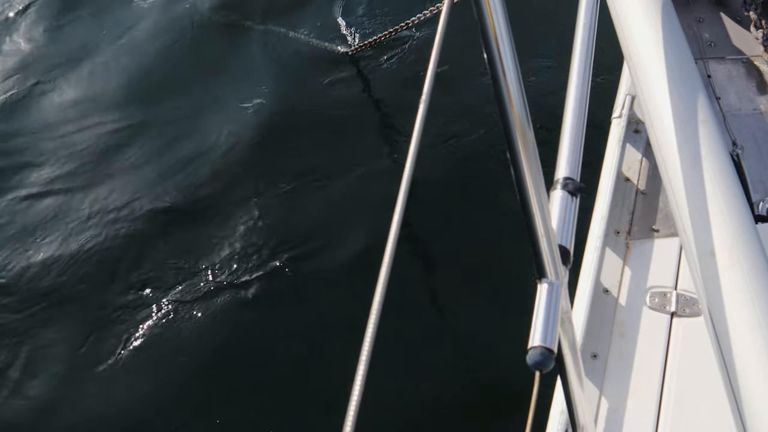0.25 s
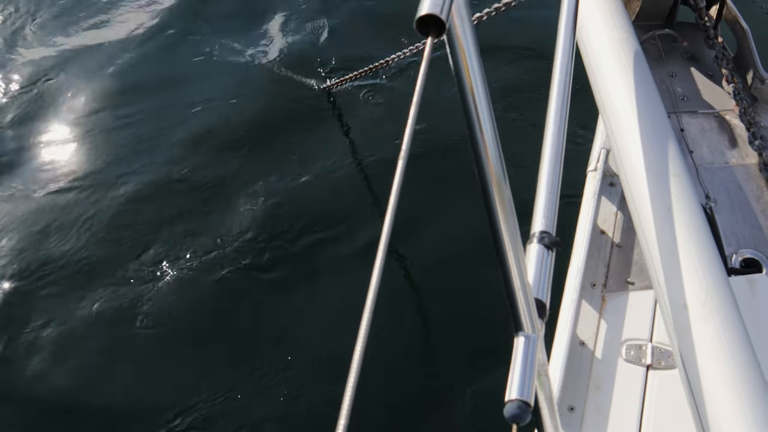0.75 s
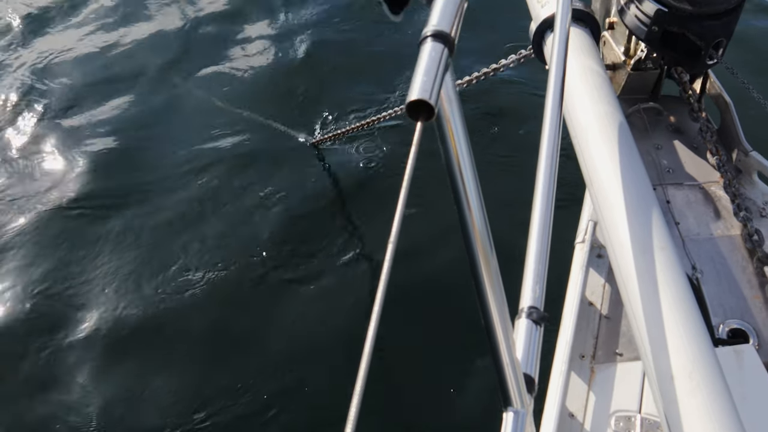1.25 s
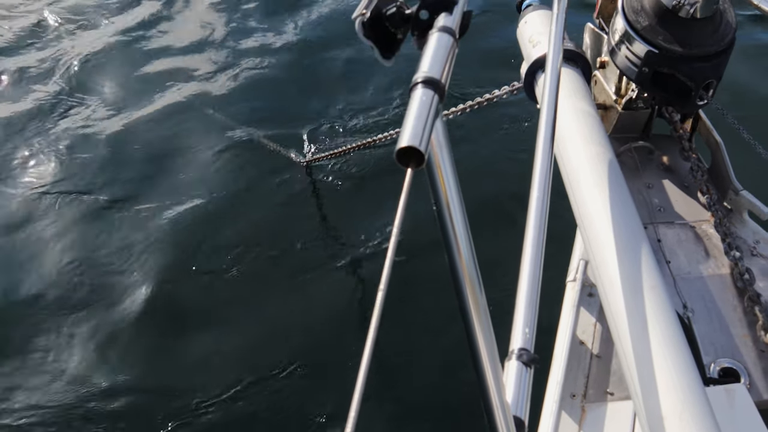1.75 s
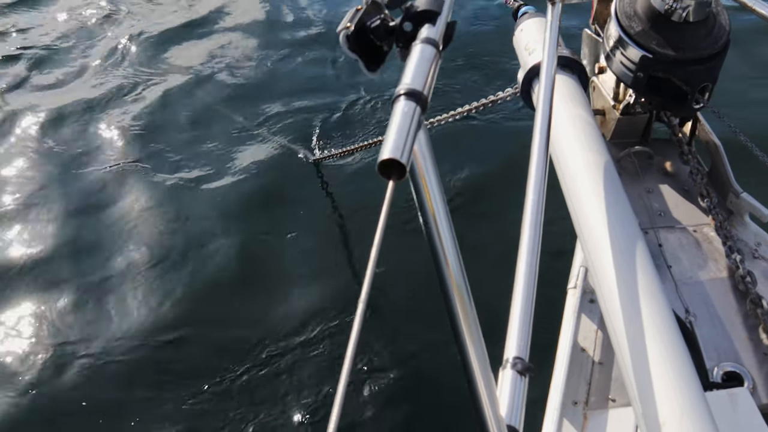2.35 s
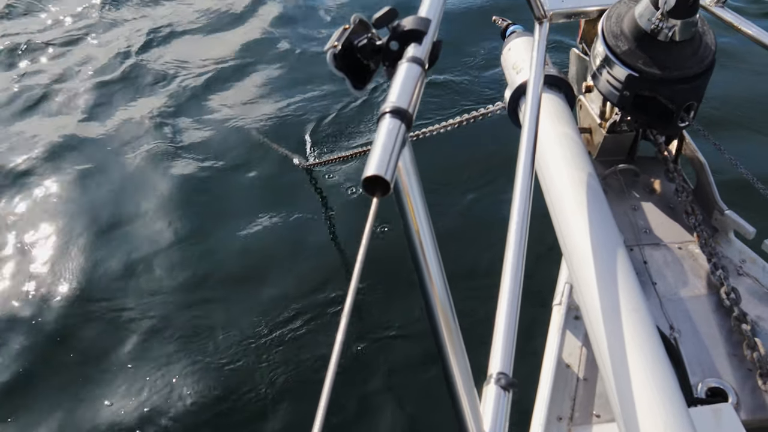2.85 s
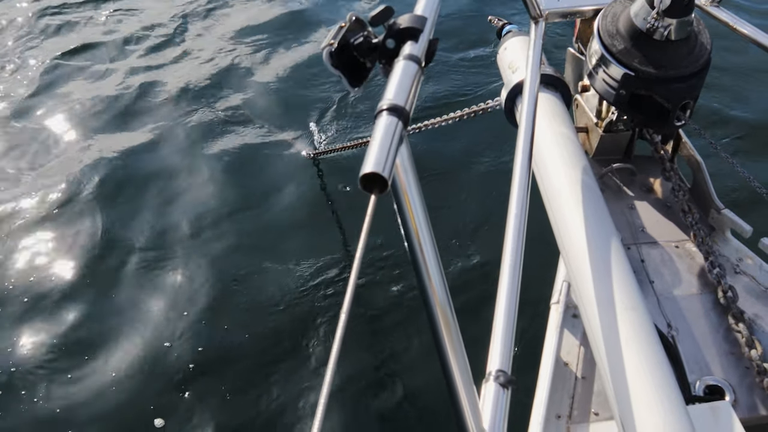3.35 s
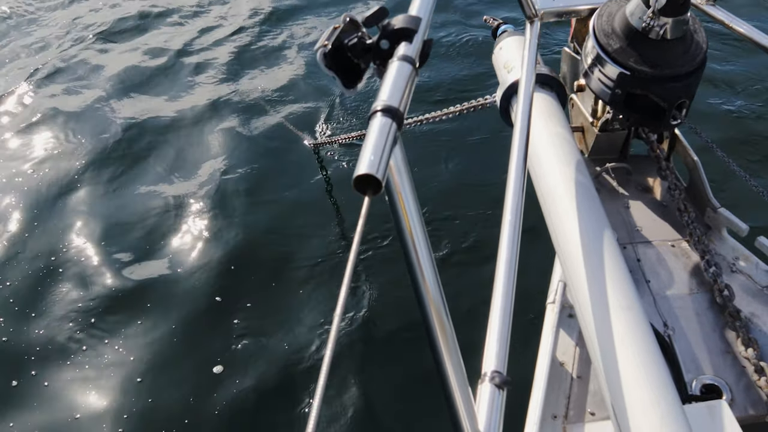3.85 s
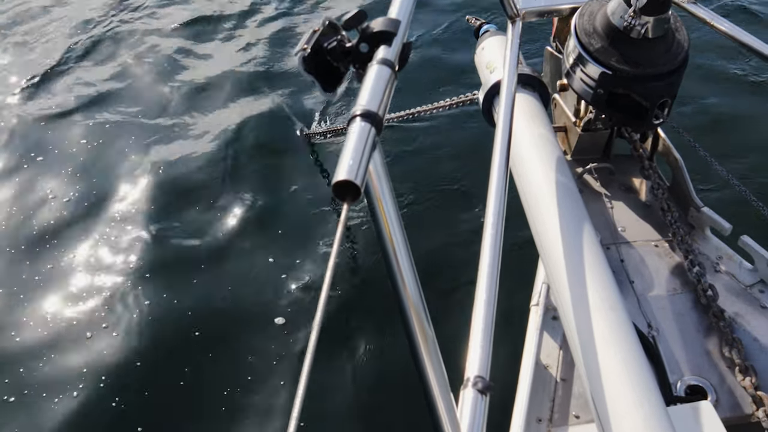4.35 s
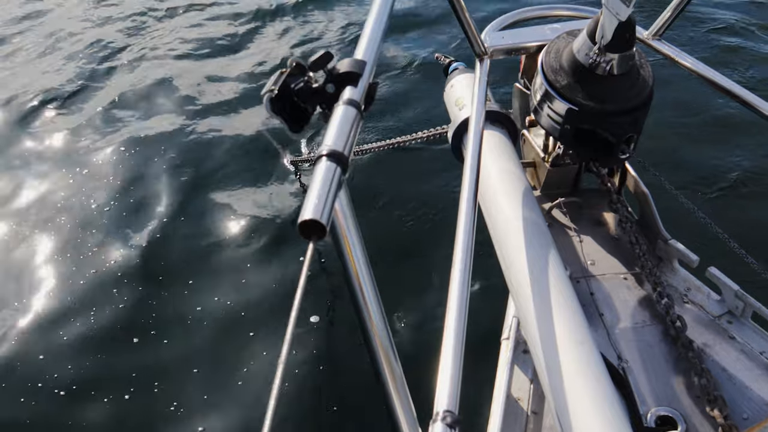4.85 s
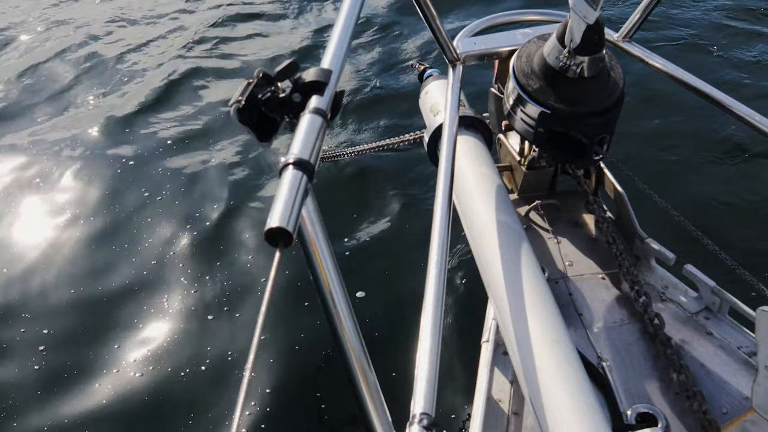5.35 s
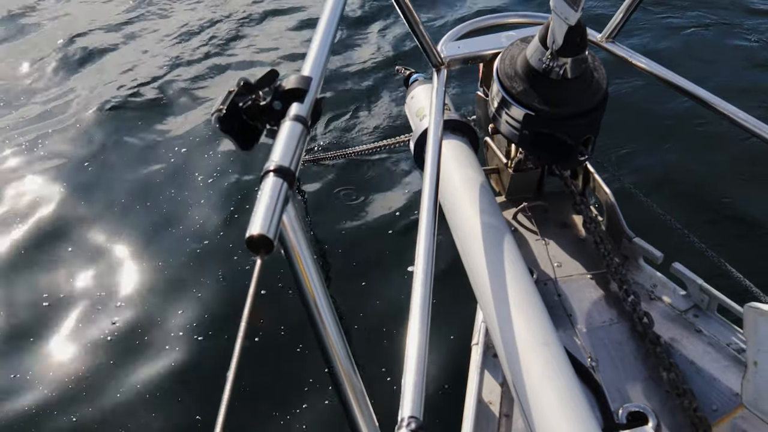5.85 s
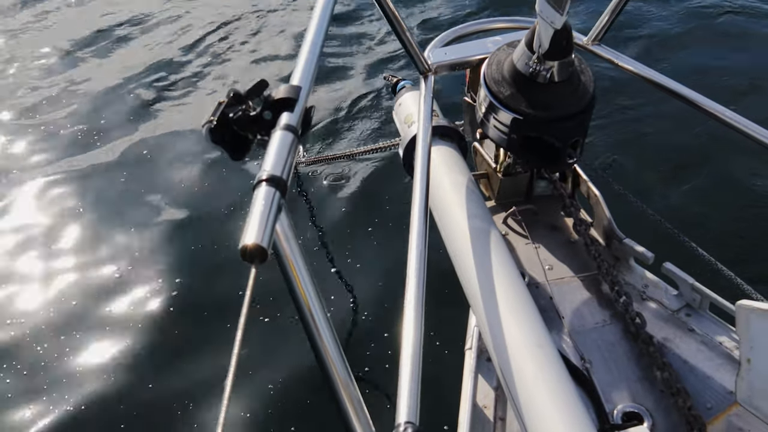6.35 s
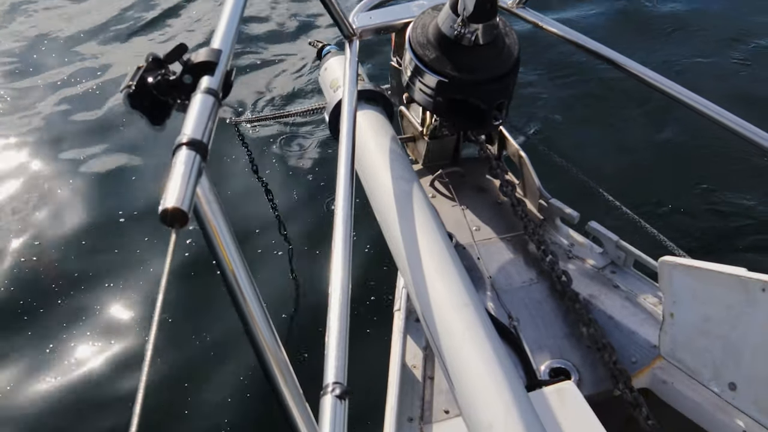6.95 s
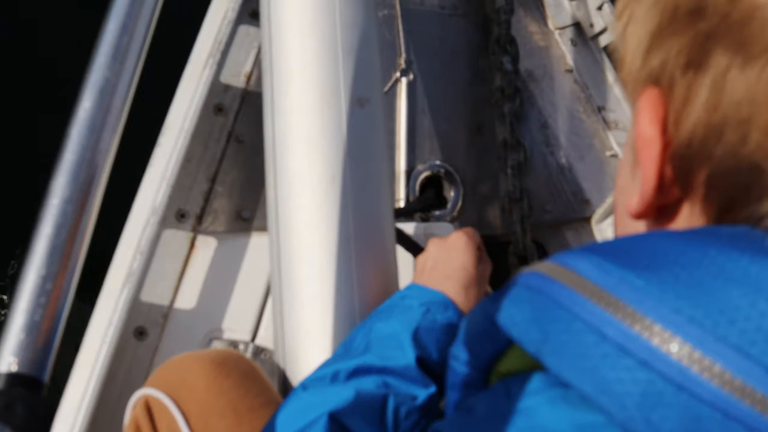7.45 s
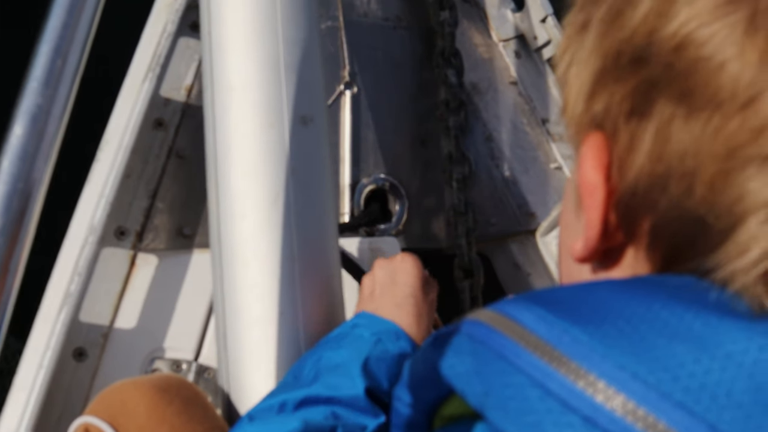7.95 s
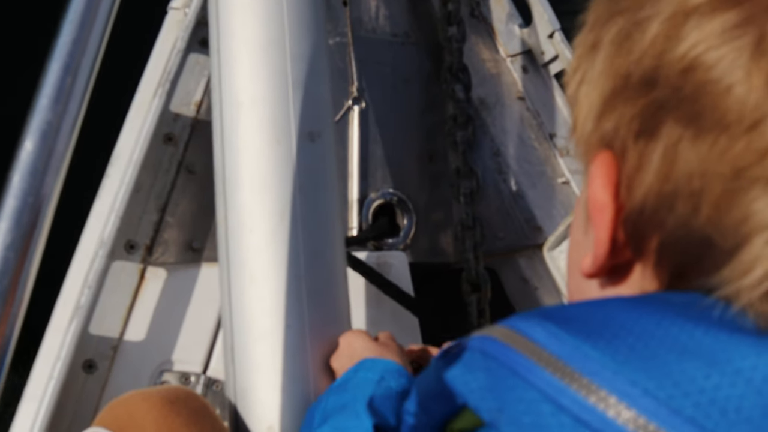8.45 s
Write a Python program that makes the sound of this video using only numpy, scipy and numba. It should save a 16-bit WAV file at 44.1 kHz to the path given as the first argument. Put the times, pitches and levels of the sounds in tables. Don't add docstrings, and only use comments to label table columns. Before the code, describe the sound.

Sparse, loud chain knocks boom and crack on a metal boat deck, with ringing rail, small link ticks, drips and low idling hum between.

```python
import sys
import numpy as np
from scipy import signal
from scipy.fft import rfft, irfft
from scipy.io import wavfile
from numba import njit

SR = 44100
rng = np.random.default_rng(int(sys.argv[2]) if len(sys.argv) > 2 else 0)


def persist_wave(psi):
    counts = np.round(np.clip(psi, -1, 1) * 32767).astype(np.int16)
    wavfile.write(sys.argv[1], SR, np.atleast_2d(counts).T)


def voltage_ratio(level):
    return 10 ** (np.asarray(level, float) / 20)


N = 383669

# start_s, boom_230hz_db, hull_120hz_db, deck_420hz_db, steel_1100hz_db
KNOCKS = [(0.018, -16.5, -33, -31.5, -51), (0.467, -31, -70, -37.5, -45.5), (0.640, -14.5, -17, -15, -22.5),
          (0.656, -9.5, -12.5, -16, -16), (1.090, -2, -5, -9.5, -7.5), (1.104, -8.5, -8, -3.5, -40.5),
          (3.442, -40.5, -46, -49.5, -65), (3.522, -47, -42.5, -43, -63), (3.635, -14, -6.5, -9, -14.5),
          (3.645, -8, -10.5, 0, -5), (3.829, -32, -31, -21, -42.5), (3.852, -30, -38, -24, -53),
          (5.716, -7, -11.5, -10.5, -15), (5.743, -18.5, -9, -9.5, -22.5), (5.823, -11, -32.5, -12, -4.5),
          (6.506, -47, -48, -34.5, -51.5), (6.82, -9.5, -16.5, -22, -15.5), (6.843, -9, -12.5, -11, -21.5),
          (7.831, -16, -16.5, -14, -18.5)]
KNOCK_HZ = [60, 120, 230, 420, 1100, 3300, 15500]
# mode_hz, level_db
HULL_MODES = [(102, -12), (130, 1.5), (158, 3), (188, 4), (218, -2), (245, -0.5), (275, 4.5), (345, 5.5),
              (380, -3.5), (436, 3.5), (474, -5), (545, -0.5), (630, 4.5), (692, 0.5), (945, 3), (1180, -1),
              (1383, -3.5), (1525, 0.5), (1686, -2.5), (1865, -5), (2295, -14), (2930, -7)]
# mode_hz, t60_s
PLATE_T60 = [(100, 0.27), (250, 0.24), (500, 0.19), (1000, 0.21), (1600, 0.15), (2700, 0.15), (4000, 0.12),
             (5400, 0.11)]
# mode_hz, level_db
PLATE_COLOUR = [(80, -4.5), (700, -7), (1500, -5), (2000, -5.5), (4500, -12), (5300, -30), (7000, -45),
                (7500, -50.5)]
# start_s, peak_db, tilt_db_per_octave
BARE_STEEL = [(0.6403, -59, -13), (0.657, -53.5, -11), (1.0903, -37.5, -2.5), (3.635, -43.5, -3.5),
              (3.644, -30, -4), (5.718, -54.5, 0.5), (5.823, -30, 3), (6.822, -61, -3), (7.830, -46.5, -9)]
# centre_hz, spread_log_pitch, level_db, t60_s
CRACKS = [
    (3130, 0.24, 6.5, 0.11),
    (6300, 0.33, -1.7, .11),
    (8760, 0.32, 0, 0.082),
    (2620, 0.5, 1.5, 0.011),
]
# start_s, level_db, pitch_hz, t60_s
RAIL = [(1.092, -29, 1040, 0.45), (1.092, -29, 1037.2, 0.47), (1.092, -28, 1109, .17),
        (3.647, -20.5, 1054, 0.37), (3.646, -37, 1031, .85), (3.647, -26, 982, .28),
        (3.647, -27, 1104, .26), (3.647, -28, 1163, .23), (5.825, -21, 1053, 0.43), (5.823, -38, 1031, 0.8),
        (5.825, -28.5, 985, .2), (5.825, -32, 1125, .24), (5.825, -33, 1163, .28)]
# start_s, level_db, pitch_hz
CLANGS = [(.02, -28, 225), (.64, -14.5, 181), (.641, -29, 500), (.641, -29, 2050), (.641, -43, 3000),
          (.643, -20, 680), (0.659, -19, 128), (0.659, -29, 1230), (1.088, -9, 224), (1.09, -15.5, 850),
          (1.09, -17.5, 1225), (1.09, -19.5, 1480), (1.09, -19, 1853), (1.09, -12, 327),
          (1.089, -12.5, 1340), (1.089, -18, 1603), (1.091, -16.5, 982), (1.092, -30.5, 2600),
          (1.09, -12, 375), (1.1, -14, 446.7), (3.636, -14.5, 570), (3.638, -11.5, 690),
          (3.645, -16.5, 184), (3.645, -11.5, 890), (3.645, -18.5, 1125), (3.645, -19, 1554),
          (3.646, -21, 3094), (3.645, -8, 1669), (5.715, -14.5, 290.5), (5.718, -16, 330),
          (5.717, -14, 390), (5.73, -25, 570), (5.718, -20.5, 830), (5.717, -23.5, 1390),
          (5.743, -23.5, 901), (5.824, -18, 796), (5.824, -11, 920), (5.823, -18, 1222), (5.826, -25, 2327),
          (5.825, -23, 2449), (5.823, -16.5, 1500), (5.823, -22, 1300), (5.823, -26.5, 350),
          (6.821, -13, 197.7), (6.82, -13, 350), (6.82, -8, 275), (6.82, -17, 420), (6.82, -34, 2210),
          (6.843, -14, 203), (6.82, -9.5, 395), (6.82, -31, 2000), (7.832, -18.5, 228), (7.811, -40, 228),
          (7.812, -44, 1120), (7.812, -53, 1674), (7.835, -12.5, 440), (7.832, -22, 620),
          (7.832, -21.5, 842), (7.833, -24.5, 760), (7.833, -26, 1020), (.659, -37, 3450),
          (7.83, -34, 3300)]
# start_s, level_db, centre_hz, spread_log_pitch, t60_s
CLUSTERS = [(.658, -31, 3300, 0.095, .04), (1.135, -18.5, 360, .06, .22), (1.135, -21, 235, .06, .15),
            (1.091, -18, 1700, .15, .05), (3.647, -32, 2900, .035, .24), (3.66, -18, 420, .1, .2),
            (3.685, -22, 500, .12, .15), (3.712, -24, 330, .2, .16), (3.85, -21, 355, .08, .1),
            (3.84, -42, 830, .05, .15), (5.718, -47, 7900, .025, .13), (5.718, -48, 9100, .03, .11),
            (5.824, -42, 6800, .04, .14), (5.824, -42.5, 10000, .04, .16), (5.824, -48.5, 10300, .04, .15),
            (5.824, -52, 11900, .05, .17), (5.825, -34, 2900, .05, .22), (5.81, -60, 9000, .3, .04),
            (5.715, -13, 285, .05, .15), (6.823, -20.5, 470, .06, .16), (6.821, -30, 1500, .12, .05),
            (7.833, -23, 170, 0.068, 0.11), (7.834, -21.5, 470, 0.0605, .2), (7.832, -25, 930, 0.058, 0.11),
            (7.831, -28, 1150, .08, .06), (7.86, -30, 480, 0.123, 0.16), (7.82, -40, 1200, .06, .05),
            (5.823, -32, 5250, 0.069, .13), (1.091, -42, 5250, .06, .14), (5.717, -50, 5200, .06, .14),
            (3.7, -25, 115, .15, 0.39), (3.665, -18, 355, .06, 0.19), (3.636, -18, 910, .06, .06),
            (3.646, -48, 11300, .07, .14), (6.85, -27, 120, 0.14, .2), (1.1, -30, 65, 0.19, .3),
            (1.15, -34, 1050, .02, .22), (1.094, -16, 850, .05, .05), (1.158, -24, 330, .1, .17),
            (1.1, -22, 1900, .2, .04), (3.715, -30, 1075, .03, .2), (3.7, -24, 200, .1, .25),
            (3.636, -18, 200, .08, .15), (3.69, -36, 1700, .03, .2), (3.858, -28, 420, .15, .07),
            (5.722, -15, 290, .04, .12), (5.745, -22, 800, .1, .08), (5.86, -40, 2300, .2, .2),
            (5.99, -48, 1050, .008, .3), (.657, -26, 1900, .3, .03), (.672, -38, 3200, .25, .08),
            (6.846, -42, 3000, .25, .1), (7.831, -23, 1000, .08, .07), (7.86, -24, 450, .1, .12),
            (7.875, -42, 1050, .15, .17), (3.444, -46, 650, .2, .04), (6.507, -44, 650, .2, .04)]
# start_s, level_6800hz_db, ring_factor, relative_5600hz_db, relative_9100hz_db
TICKS = [(6.935, -64, 0.62, 9, 7), (6.9514, -55, 0.88, 11, 9.5), (6.96, -53.5, 0.57, 15.5, 2),
         (6.966, -51.5, 0.91, 8, 2), (7.555, -68, .8, -5, -3), (7.586, -62, .8, -10, -10),
         (7.596, -56, 0.81, -8, -3), (7.602, -52, 0.95, -17, -11), (7.613, -55, 1.0, -19, -11),
         (7.8019, -19.5, 0.66, -15.5, -11.5), (7.83, -33.5, 0.38, 6.5, -12), (8.043, -54, 0.66, -15, -15),
         (8.0504, -39.5, 1, -1, -1), (8.329, -57, 0.98, 0, -4), (8.3544, -57, 1.0, -8, -10),
         (8.3619, -59, 1.0, 0, -9)]
# mode_hz, level_db, t60_s
LINK_MODES = [(5360, -6, 0.02), (5710, -2, 0.024), (6530, -7, 0.025), (6740, -10.5, 0.073),
              (6800, -0.5, 0.038), (6990, -22, 0.06), (8495, -15, 0.021), (9060, 7.5, 0.023),
              (9140, -5, 0.05), (10400, -23, 0.023), (11400, -21, 0.018), (14020, -25.5, 0.022),
              (14930, -18, .018)]
# start_s, peak_db, pitch_hz
SNAPS = [(0.056, -49, 3280), (.33, -55, 3470), (1.889, -45, 4740), (1.912, -48.5, 7100),
         (2.153, -40.5, 4300), (2.424, -48, 1750), (2.425, -55, 3800), (3.066, -51, 3200),
         (3.196, -52, 3900), (3.232, -53, 4500), (3.374, -50.5, 2500), (6.79, -57.5, 2960),
         (6.796, -49, 2990), (6.809, -42, 2440), (7.523, -62, 3000), (7.553, -57, 3496), (7.79, -50, 1900),
         (7.942, -49, 1900), (7.965, -53, 2107)]
# pitch_ratio, level_db
SNAP_MODES = [(1, -1.5), (1.09, -4), (1.4, -5.5), (1.75, -10.5), (2.2, -16), (2.8, -16)]
# start_s, peak_db, pitch_hz, t60_s
DRIPS = [(3.102, -48, 3050, 0.018), (3.136, -54, 4000, .015), (3.172, -26, 3960, 0.02),
         (3.177, -48, 2360, .02), (3.187, -43, 1950, 0.014), (3.268, -45.5, 2080, .02),
         (5.0, -58, 1750, .03), (5.293, -55, 1903, .08), (5.549, -47.5, 1440, 0.15),
         (5.572, -46.5, 1210, 0.15), (6.1, -53, 2640, 0.026), (6.115, -44, 1140, 0.072),
         (6.132, -57, 2740, 0.024), (6.24, -56, 2700, .03), (6.411, -41, 1330, 0.051),
         (6.451, -47, 1310, .05), (6.558, -40, 1180, 0.034), (6.71, -42, 1515, 0.036),
         (6.965, -43, 11400, 0.015), (6.99, -46, 1380, .043), (7.025, -46, 2560, 0.025),
         (7.035, -46, 1740, .04), (7.061, -38.5, 1987, 0.015), (8.243, -50, 1992, 0.032)]
CREAK_HZ = [3960, 2300]
# middle_s, peak_db, pitch_hz, half_length_s
THUMPS = [(0.319, -29.5, 57, 0.01), (0.799, -34, 43.4, 0.052), (0.954, -31.5, 54.7, 0.0098),
          (1.46, -41, 59.6, 0.027), (1.716, -30, 46.2, 0.029), (1.891, -32.5, 54.3, 0.021),
          (1.96, -39, 55.7, 0.025), (2.053, -48, 45.3, 0.026), (2.389, -27.5, 59, 0.01),
          (2.515, -37, 47.5, 0.022), (2.747, -34, 55.7, 0.023), (2.952, -33.5, 47.7, 0.014),
          (3.057, -36.5, 50.3, 0.034), (5.408, -35.5, 37.5, 0.022), (7.003, -47, 42.6, 0.029),
          (7.152, -34, 81, 0.03), (7.406, -21, 66.7, 0.0093), (7.589, -41, 46, 0.025),
          (7.666, -26.5, 71.6, 0.011), (7.705, -38, 71, 0.013), (7.918, -29, 63.6, 0.014)]
# time_s, level_db
WIND_LEVEL = [(0.0, -48), (0.29, -46), (0.85, -47.5), (1.38, -49.5), (1.94, -45.5), (4.07, -47),
              (4.38, -45), (5.21, -51), (5.67, -46), (6.32, -50), (7.0, -44), (7.17, -54), (7.58, -50.5),
              (7.95, -62), (8.7, -52.5)]
# frequency_hz, level_db_per_hz
WIND_SPECTRUM = [(15, -7), (30, -12.5), (55, -6.5), (100, -14.5), (150, -27.5), (250, -29.5)]
# middle_s, peak_db,
# half_length_s
STIRS = [(1.056, -63, 0.061), (1.683, -78, 0.1), (3.162, -57.5, 0.1), (5.018, -71.5, 0.42),
         (5.814, -53, .012), (6.654, -59.5, .35), (7.299, -68, 0.48), (8.297, -59.5, 0.094),
         (8.59, -66, 0.29)]
# frequency_hz, level_db_per_hz
RUSTLE_SPECTRUM = [(900, -21), (1600, -1.5), (2500, -6.5), (4500, -9), (6000, -18.5), (10000, -20.5)]
# centre_hz, width_hz, level_db, lag_s, fade_s
FIRING = [
    (1255, 110, -69, 0, .015),
    (520, 250, -61, .011, .012),
    (1385, 130, -68.5, .002, .015),
]
# frequency_hz, level_db_per_hz
HUM_SPECTRUM = [(65, -30), (110, -4), (135, 3.5), (248, -4.5), (334, -6), (410, -5.5), (498, 0.5),
                (559, -10.5), (636, -12), (792, -16), (1090, -24.5), (1380, -20), (2400, -69.5),
                (3120, -84.5), (5280, -120)]
# centre_hz, width_hz, level_db
HUM_PEAKS = [(127, 7.5, -5), (332.7, 12, -4.5), (457, 40, -11), (624.2, 14, -8), (690, 18, -21),
             (850, 40, -26), (1328, 260, -34)]
# frequency_hz, level_db_per_hz
HISS_SPECTRUM = [(1000, -12.5), (2500, -2), (8000, -1.5), (12000, -3.5), (14500, -4), (15800, -5),
                 (16500, -10)]
# time_s, level_db
HISS_LEVEL = [(0, -69.5), (6.9, -68.5), (7.4, -70), (7.7, -75.5), (8.2, -76), (8.7, -78)]

LATE_S, LATE_T60_FACTOR = 7.5, 0.83
TREBLE_DB, TREBLE_PER_STEEL_DB = -9, 1.316
CLACK_DB, CLACK_PER_LOW_DB = -2, 0.48
CREAK_MIDDLE_S, CREAK_HALF_S, CREAK_T60_S = 3.165, 0.1, 0.014
CREAK_DB, CREAK_FADE_DB = -47, 10
FIRINGS_PER_S, FIRST_FIRING_S, FIRING_SCATTER_DB = 24.2, 0.005, 2.2
HUM_DB, HUM_LATE_DB, HUM_FALL_FROM_S, HUM_FALL_BY_S = -48.5, -55.5, 7.25, 7.65
RUSTLE_REST_DB = -74


def rms_one(x):
    return x / np.sqrt(np.mean(x ** 2) + 1e-20)


def in_time(rows):
    time_s, level_db = np.transpose(rows)
    return np.interp(np.arange(N) / SR, time_s, level_db)


def at_hz(points, hz):
    point_hz, value = np.transpose(points)
    return np.interp(np.log(hz), np.log(point_hz), value)


def drift(rate_hz):
    r = np.exp(-80 * np.pi * rate_hz / SR)
    slow = signal.lfilter([1], [1, -2 * r, r * r], rng.standard_normal(N // 40 + 2002))[2000:]
    return np.interp(np.arange(N) / 40, np.arange(len(slow)), rms_one(slow))


def coloured(spectrum, white):
    hz = np.maximum(np.arange(N // 2 + 1) * SR / N, 1)
    level_db = at_hz([(1, -90)] + list(spectrum) + [(SR, -90)], hz)
    return rms_one(irfft(rfft(white) * voltage_ratio(level_db), N))


def resonate(x, hz, width_hz):
    r = np.exp(-np.pi * width_hz / SR)
    return signal.lfilter([1, 0, -1], [1, -2 * r * np.cos(2 * np.pi * hz / SR), r * r], x)


@njit
def ringing(hz, gain, t60, rise, size, sr):
    out = np.zeros(size)
    for k in range(len(hz)):
        turn = np.exp((2j * np.pi * hz[k] - np.log(1000) / t60[k]) / sr)
        state, swell, keep = gain[k] + 0j, 1.0, np.exp(-1 / (rise[k] * sr))
        for i in range(min(size, int(1.2 * t60[k] * sr))):
            out[i] += state.imag * (1 - swell)
            state *= turn
            swell *= keep
    return out


def add(track, start_s, hz, gain, t60_s, rise_s):
    columns = np.broadcast_arrays(np.atleast_1d(hz), gain, t60_s, rise_s)
    hz, gain, t60_s, rise_s = [np.array(c, float) for c in columns]
    ring = ringing(hz, gain, t60_s, rise_s, int(1.2 * t60_s.max() * SR), SR)
    at = round(start_s * SR)
    track[at:at + len(ring)] += ring[:N - at]


def plate_t60(start_s, hz):
    return at_hz(PLATE_T60, hz) * (LATE_T60_FACTOR if start_s > LATE_S else 1)


def knocks():
    out = np.zeros(N)
    hull_hz, hull_db = np.transpose(HULL_MODES)
    grid_hz = np.linspace(80, 7500, 1300)
    luck = rng.standard_normal((len(KNOCKS), 2, len(hull_hz) + len(grid_hz)))
    for (s, boom, deep, low, steel), (chance, shift) in zip(KNOCKS, luck):
        plate_hz = grid_hz + 3.2 * shift[len(hull_hz):]
        hz = np.r_[hull_hz, plate_hz]
        body_db = np.r_[hull_db, at_hz(PLATE_COLOUR, plate_hz)]
        t60_s = plate_t60(s, hz) * np.exp(0.18 * np.clip(shift[::-1], -2, 2))
        treble = TREBLE_DB + TREBLE_PER_STEEL_DB * steel
        colour_db = [deep - 28, deep - 11, boom - 12, low - 13, steel - 17, treble - 18, treble - 18]
        gain = voltage_ratio(at_hz(np.c_[KNOCK_HZ, colour_db], hz) + body_db)
        gain *= np.sign(chance) * np.abs(chance) ** 0.21
        add(out, s, hz, gain, t60_s, 0.00039 + 0.72 / hz)
    return out


def steel_cracks():
    out = np.zeros(N)
    luck = rng.standard_normal((len(BARE_STEEL), len(CRACKS), 2, 500))
    for (s, db, tilt_db), cracks in zip(BARE_STEEL, luck):
        for (centre_hz, width, share_db, t60_s), (apart, chance) in zip(CRACKS, cracks):
            hz = np.minimum(centre_hz * np.exp(width * apart), SR / 2.5)
            level_db = db + share_db + tilt_db * np.log2(centre_hz / CRACKS[1][0]) - 22
            gain = voltage_ratio(level_db) * chance / (1 + (hz / 12600) ** 17)
            add(out, s, hz, gain, t60_s * (centre_hz / hz) ** 0.47, 0.0006)
    return out


def clangs():
    out = np.zeros(N)
    for s, db, hz in CLANGS:
        add(out, s, [hz, 1.02 * hz], voltage_ratio([db, db - 11.5]), 0.8 * plate_t60(s, hz), 0.0008 + 0.71 / hz)
    return out


def clusters():
    out = np.zeros(N)
    parts = CLUSTERS
    luck = rng.standard_normal((len(parts), 3, 12))
    for (s, db, hz, width, t60_s), (apart, chance, lasting) in zip(parts, luck):
        gain = voltage_ratio(db - 9) * np.sign(chance) * np.abs(chance) ** 0.3
        add(out, s, hz * np.exp(width * apart), gain, t60_s * np.exp(0.15 * lasting), 0.0005 + 1.2 / hz)
    return out


def rail():
    out = np.zeros(N)
    for s, db, hz, t60_s in RAIL:
        add(out, s, [hz, hz + 7], voltage_ratio([db, db - 15]), t60_s, 22 / hz)
    return out


def ticks():
    out = np.zeros(N)
    link_hz, link_db, link_t60_s = np.transpose(LINK_MODES)
    spray_hz = rng.uniform(2000, 15500, 200)
    spray_db = at_hz([(2000, -14), (5000, -16), (9500, -18), (11000, -30), (15500, -36)], spray_hz)
    hz = np.r_[link_hz, spray_hz]
    body_db = np.r_[link_db, spray_db]
    t60_s = np.r_[link_t60_s, np.resize([0.022, 0.022, 0.06], len(spray_hz))]
    luck = np.clip(rng.standard_normal((len(TICKS), len(hz))), -2, 1.5)
    for (s, db, lasting, low_db, high_db), chance in zip(TICKS, luck):
        clack_db = CLACK_DB + CLACK_PER_LOW_DB * low_db
        colour = [(4300, clack_db), (5000, low_db), (6000, low_db), (6500, 0), (7300, 0), (8500, high_db)]
        gain = voltage_ratio(db - 0.5 + body_db + at_hz(colour, hz) + 2 * chance) * np.sign(chance[::-1])
        add(out, s, hz, gain, lasting * t60_s, 0.0002)
    return out


def snaps():
    out = np.zeros(N)
    ratio, mode_db = np.transpose(SNAP_MODES)
    for s, db, hz in SNAPS:
        add(out, s, np.minimum(hz * ratio, SR / 2.5), voltage_ratio(db + mode_db), 32 / hz, 0.0003)
    return out


def creak_slips():
    even = np.linspace(-1, 1, 13)
    place = 0.6 * even ** 3 + 0.4 * even
    slips = []
    for k, p in enumerate(place):
        late, off = rng.standard_normal(2)
        s = CREAK_MIDDLE_S + CREAK_HALF_S * p + 0.002 * late
        db = CREAK_DB - CREAK_FADE_DB * abs(p) ** 0.5
        slips.append((s, db, CREAK_HZ[k % 2] * (1 + 0.075 * off), CREAK_T60_S))
    return slips


def drips_and_creak():
    out = np.zeros(N)
    for s, db, hz, t60_s in list(DRIPS) + creak_slips():
        add(out, s, [hz, 1.09 * hz], voltage_ratio([db, db - 6]), t60_s, 0.054 * t60_s)
    return out


def wind():
    breeze_db = in_time(WIND_LEVEL) + 2.5 + 2.8 * drift(6.3)
    out = voltage_ratio(breeze_db) * coloured(WIND_SPECTRUM, rng.standard_normal(N))
    t = np.arange(-SR // 5, SR // 5) / SR
    for s, db, hz, half_s in THUMPS:
        at = round(s * SR) - len(t) // 2
        out[at:at + len(t)] += voltage_ratio(db) * np.cos(2 * np.pi * hz * t) * np.exp(-0.5 * (t / half_s) ** 2)
    return out


def rustle():
    t = np.arange(N) / SR
    sizes = voltage_ratio(3 * np.minimum(rng.exponential(1, N), 3.5)) * rng.choice([-1, 1], N)
    born = rng.random(N) < 4000 * voltage_ratio(2.5 * drift(15)) / SR
    stir = np.full(N, voltage_ratio(RUSTLE_REST_DB))
    for s, db, half_s in STIRS:
        stir += voltage_ratio(db) * np.exp(-0.5 * ((t - s) / half_s) ** 2)
    return voltage_ratio(-7.5) * stir * coloured(RUSTLE_SPECTRUM, sizes * born)


def engine():
    out, t = np.zeros(N), np.arange(N) / SR
    chance = np.clip(rng.standard_normal(int(t[-1] * FIRINGS_PER_S) + 3), -2, 2)
    hard = voltage_ratio(FIRING_SCATTER_DB * chance)
    white = rng.standard_normal((2, N))
    for k, (hz, width_hz, db, lag_s, fade_s) in enumerate(FIRING):
        turn = (t - FIRST_FIRING_S - lag_s) * FIRINGS_PER_S + 1
        since = turn % 1 / FIRINGS_PER_S / fade_s
        burst = hard[turn.astype(int)] * since * np.exp(-2 * since)
        band = resonate(resonate(white[k % 2], hz, width_hz), hz, width_hz)
        out += voltage_ratio(db) * rms_one(band) * rms_one(burst)
    return out


def hum():
    out = coloured(HUM_SPECTRUM, rng.standard_normal(N)) * voltage_ratio(1.3 * drift(9))
    white = rng.standard_normal(N)
    for hz, width_hz, db in HUM_PEAKS:
        out += voltage_ratio(db - 4.5 + 2 * drift(5)) * rms_one(resonate(white, hz, width_hz))
    return rms_one(out)


def hiss():
    return voltage_ratio(in_time(HISS_LEVEL)) * coloured(HISS_SPECTRUM, rng.standard_normal(N))


def scene():
    hum_db = np.interp(np.arange(N) / SR, [HUM_FALL_FROM_S, HUM_FALL_BY_S], [HUM_DB, HUM_LATE_DB])
    background = voltage_ratio(hum_db) * hum() + voltage_ratio(hum_db - HUM_DB) * engine() + rustle() + hiss()
    chain = knocks() + steel_cracks() + rail() + clangs() + ticks()
    around = snaps() + drips_and_creak() + wind()
    return (chain + around + clusters() + background)[None]


def band_limit(x):
    return signal.sosfilt(signal.butter(12, 15780, fs=SR, output="sos"), x)


def record(dry):
    mix = np.clip(dry, -1, 1)
    return band_limit(mix)


dry = scene()
out = record(dry)
persist_wave(out)
```